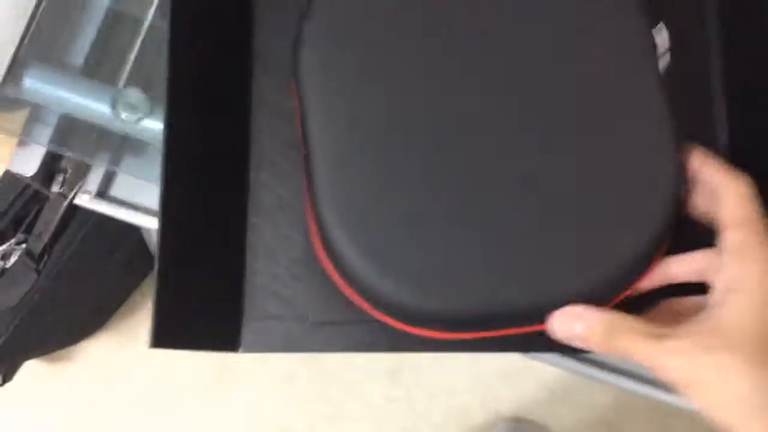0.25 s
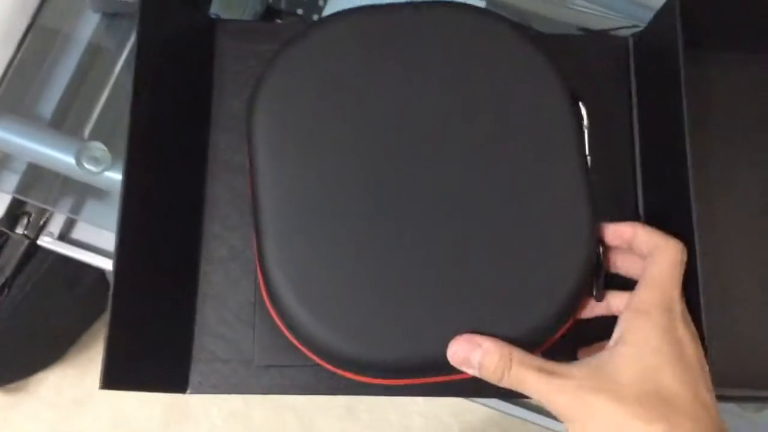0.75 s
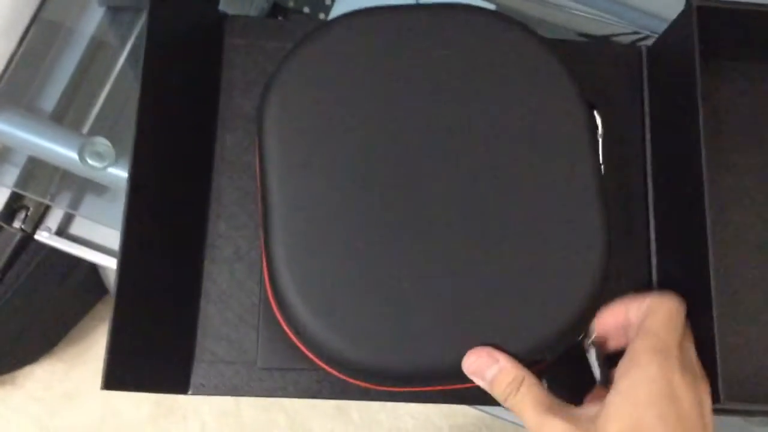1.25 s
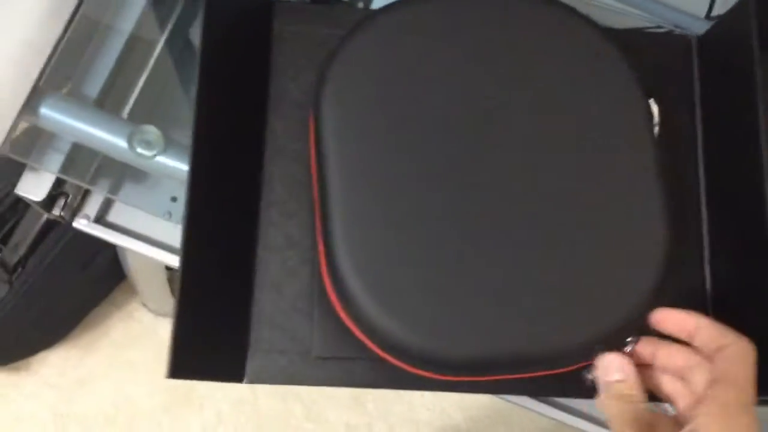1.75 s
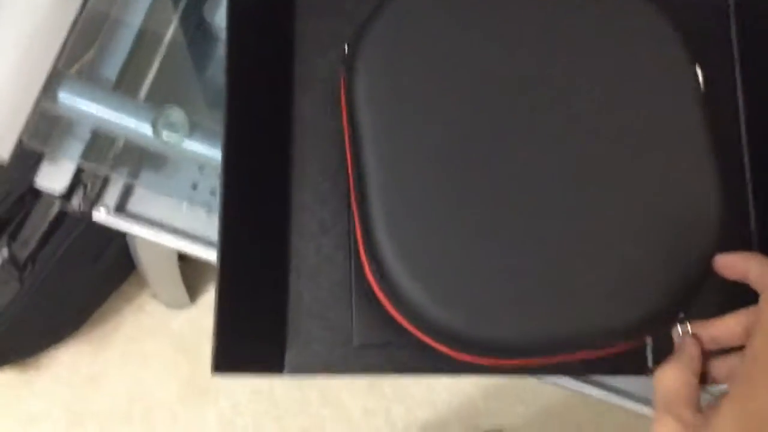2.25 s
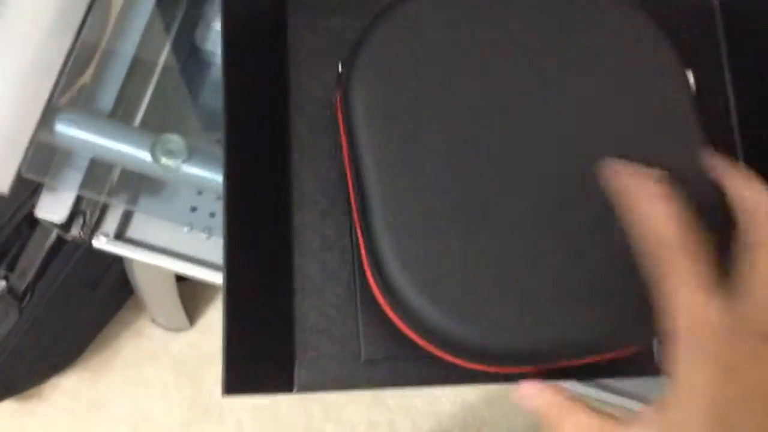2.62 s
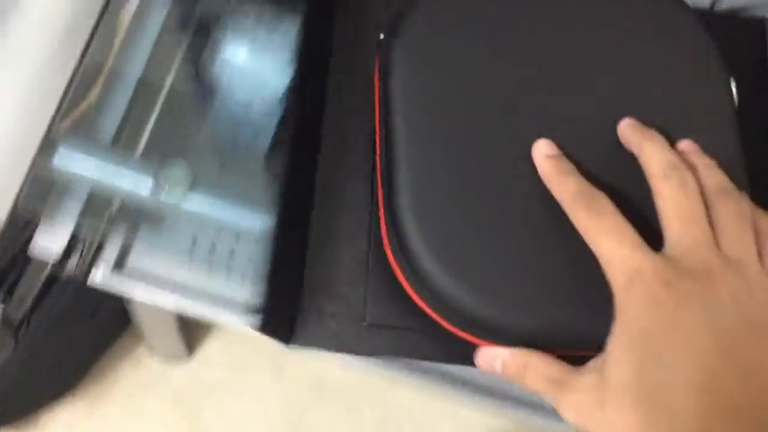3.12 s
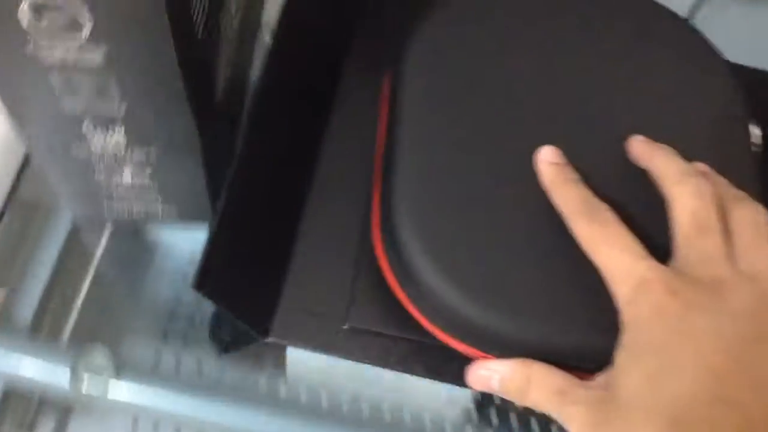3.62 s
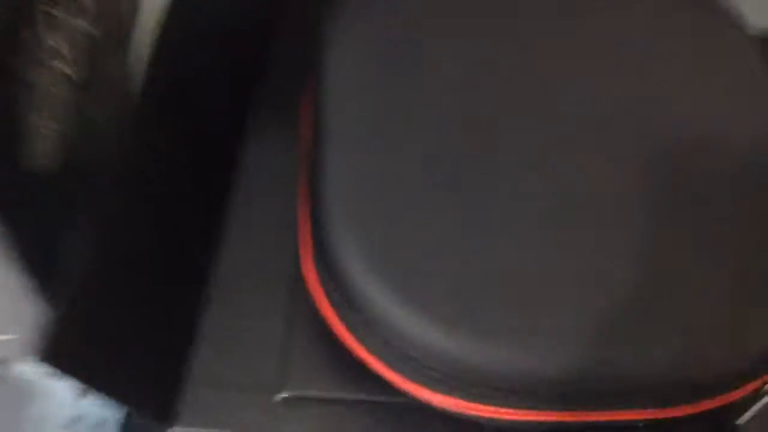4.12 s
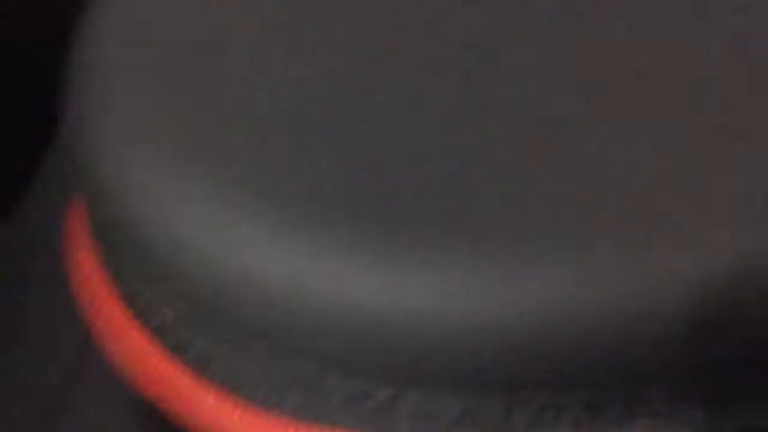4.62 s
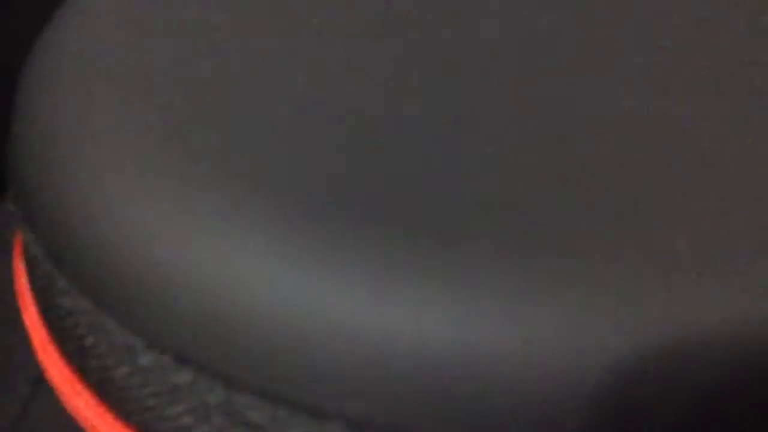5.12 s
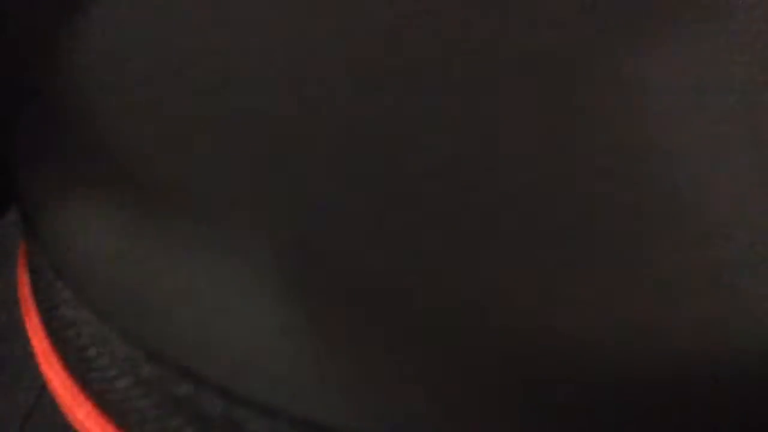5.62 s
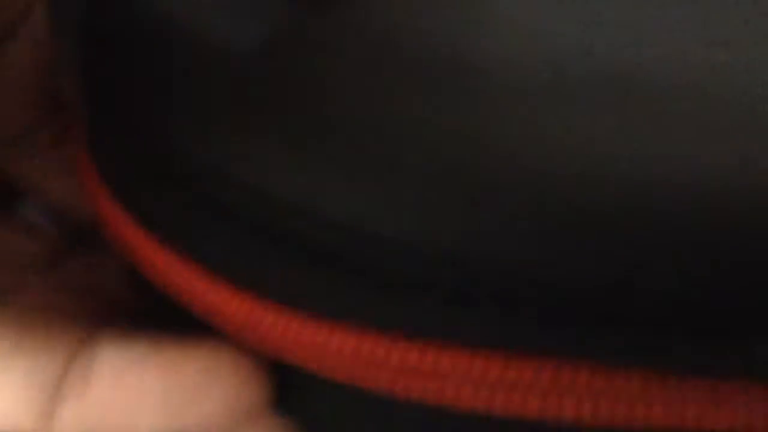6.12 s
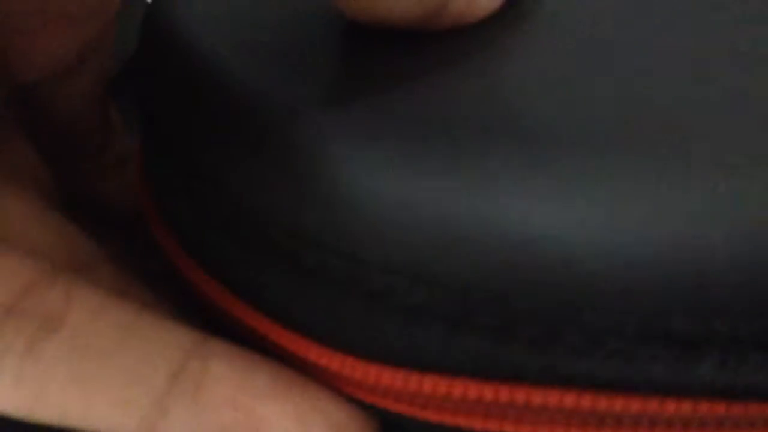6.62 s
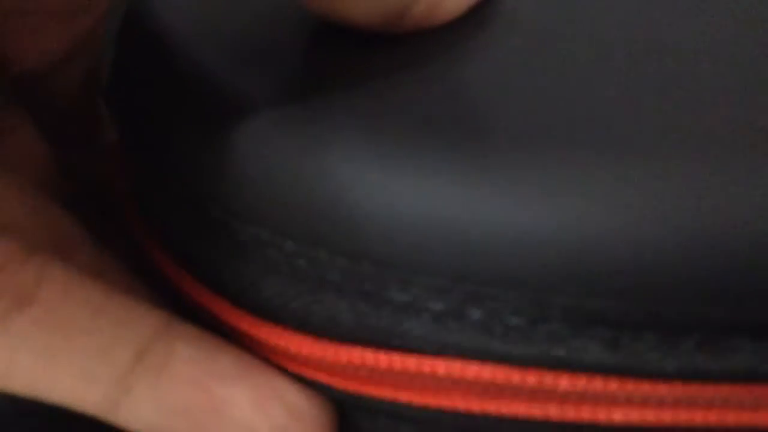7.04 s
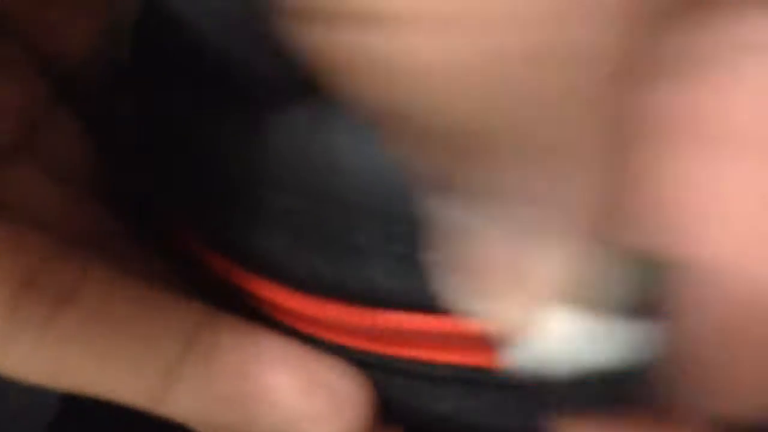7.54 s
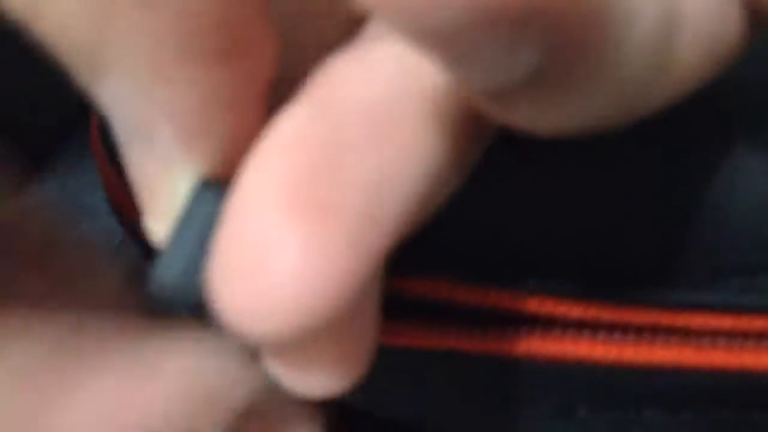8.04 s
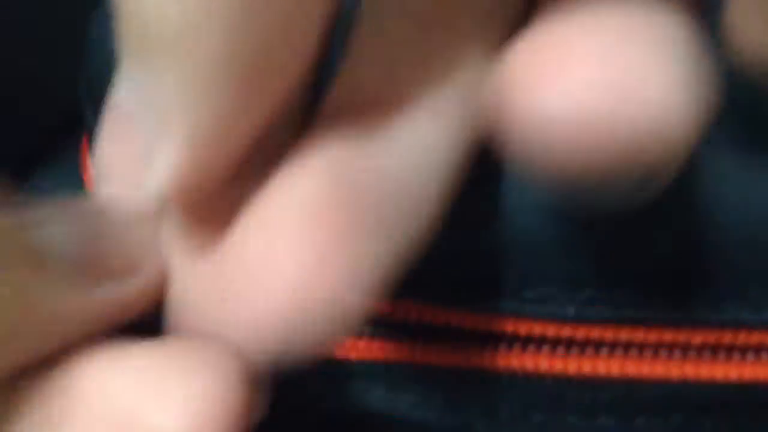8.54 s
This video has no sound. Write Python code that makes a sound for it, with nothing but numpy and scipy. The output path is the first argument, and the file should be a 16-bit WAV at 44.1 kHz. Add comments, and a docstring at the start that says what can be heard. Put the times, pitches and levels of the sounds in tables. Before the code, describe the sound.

Quiet strokes and nail ticks on a padded case, one hard box knock, loud handling thumps, then close, halting zipper rasps and clicks.

```python
"""First a hand strokes and taps a hard-shell case at arm's length in a small room; a box knocks sharply. Then
fingers bump and drag on the camera, and close by a zipper runs in short rasping tugs. Rubs are grainy filtered
noise, blows are short bursts through filters, and the box is a sum of decaying sines. The zipper is one impulse
per tooth, drumming on the resonant shell while its tape hisses. A noise tail makes the room; the microphone
trims the bass, the peaks and the top treble."""
import sys
import numpy as np
from scipy import signal
from scipy.fft import rfft, irfft, next_fast_len
from scipy.io import wavfile
from scipy.ndimage import uniform_filter1d

SR = 44100
rng = np.random.default_rng(int(sys.argv[2]) if len(sys.argv) > 2 else 0)


def to_wav(sig):
    """Store sig (one row per channel, or 1-D mono) as 16-bit WAV at the path in sys.argv[1].

    Samples outside -1..1 are clipped; the rate is SR.
    """
    pcm = np.clip(np.atleast_2d(sig), -1, 1) * 32767
    pcm = np.round(pcm).astype(np.int16)
    wavfile.write(sys.argv[1], SR, pcm.T)  # frames by channels


N = 387198  # samples


def amp(db):
    """Decibels to gain."""
    return 10 ** (np.asarray(db) / 20)


def unit(x):
    """Scale to rms 1."""
    return x / np.sqrt(np.mean(x ** 2) + 1e-20)


def along(points, hz):
    """Interpolate (Hz, value) points on a log frequency axis."""
    f, v = np.transpose(points)
    return np.interp(np.log(hz + 1), np.log(f), v)


def filtered(x, response):
    """Pass x through a complex response of frequency."""
    m = next_fast_len(N + SR // 2)
    spectrum = rfft(x, m) * response(np.fft.rfftfreq(m, 1 / SR))
    return irfft(spectrum, m)[:N]


def coloured(x, spectrum, size=4096):
    """Minimum-phase filter of unit energy with the given spectrum, so that no blow sounds early."""
    hz = np.fft.rfftfreq(size, 1 / SR)
    cepstrum = irfft(np.log(amp(along(spectrum, hz))))
    # fold the cepstrum forward in time
    cepstrum[1:size // 2] *= 2
    cepstrum[size // 2:] = 0
    kernel = irfft(np.exp(rfft(cepstrum)))
    return signal.oaconvolve(x, kernel / np.linalg.norm(kernel))[:N]


def resonance(f, centre, width):
    """Response of one damped mode."""
    return 1j * f * width / (centre ** 2 - f ** 2 + 1j * f * width)


def fibres(grain_hz, grain_db):
    """White noise whose strength wavers as fibres catch and slip."""
    grip_strength = np.interp(np.arange(N) * grain_hz / SR, np.arange(N), rng.standard_normal(N))
    return rng.standard_normal(N) * amp(grain_db * grip_strength)


def friction(spectrum, grain_hz, grain_db):
    """Grainy rubbing noise of rms 1 with the given spectrum."""
    return unit(coloured(fibres(grain_hz, grain_db), spectrum))


def patchy(x, depth_db):
    """The colour of a rub shifts from moment to moment as the point of contact moves."""
    z = signal.stft(x)[2]
    across_hz = uniform_filter1d(rng.standard_normal(z.shape), size=7, axis=0)
    field = uniform_filter1d(across_hz, size=11, axis=1)
    return unit(signal.istft(z * amp(depth_db * unit(field)))[1][:N])


def crackle(rate):
    """Sparse snaps of single fibres, on average rate a second: mostly tiny, a few large."""
    return (rng.random(N) < rate / SR) * rng.exponential(size=N).clip(0, 3)


def contacts(times, levels_db, t60, scuff):
    """Force of brief contacts: a sharp push, then a scuff that dies by 60 dB in t60 seconds."""
    force, t = np.zeros(N + SR), np.arange(SR // 4) / SR
    for s, db in zip(times, levels_db):
        burst = rng.standard_normal(len(t)) * amp(-60 * t / t60)
        burst *= scuff / np.linalg.norm(burst)
        burst[0] += 1
        force[round(s * SR):][:len(t)] += amp(db) * burst / np.linalg.norm(burst)
    return force[:N]


def gestures(rows, attack_s, release_s):
    """Attack, hold and release for each (start, length, dB, dB) row; one gain per dB column, adding in power."""
    t, power = np.arange(N) / SR, np.zeros((2, N))
    for start, length, *levels_db in rows:
        rise = np.sin(np.pi / 2 * np.clip((t - start) / attack_s, 0, 1)) ** 2
        fall = np.exp(-np.clip((t - start - length) / release_s, 0, 20))
        power += np.outer(amp(levels_db), rise * fall) ** 2
    return np.sqrt(power)


# Quiet room around the microphone. Each row: frequency in Hz, relative level in dB per Hz.
AIR_SPECTRUM = [(40, -16), (100, -3.5), (230, 7.5), (800, -1), (2500, -7), (15000, -11.5)]


def air():
    """The quiet room: steady noise with the given spectrum."""
    return amp(-64.5) * unit(coloured(rng.standard_normal(N), AIR_SPECTRUM))


# Decay of the small room. Each row: frequency in Hz, time to fall by 60 dB in seconds.
ROOM_DECAY = [(1000, 0.48), (3000, 0.41), (7000, 0.44), (15000, 0.12)]


def room(x):
    """The small room's tail, decaying noise of unit energy; the highest treble dies first."""
    hz, t, z = signal.stft(rng.standard_normal(SR * 2 // 3), SR, nperseg=256)
    decay = amp(-60 * t / along(ROOM_DECAY, hz)[:, None])
    tail = signal.istft(z * decay, SR, nperseg=256)[1]
    tail *= 1 - np.exp(-np.arange(len(tail)) / SR / 0.0018)  # the tail builds up over about 2 ms
    wet = signal.oaconvolve(x, tail / np.linalg.norm(tail))[:N]
    return filtered(wet, lambda f: f ** 2 / (f ** 2 + 120 ** 2))


# Skin on the shell. Each row: frequency in Hz, relative level in dB per Hz.
RUB_SPECTRUM = [(45, -37.5), (150, -6), (300, 1.5), (700, -6), (1100, -6.5), (1600, -10.5), (2200, -8.5),
                (3200, -20), (7000, -29.5)]
# Cloth swish. Each row: frequency in Hz, relative level in dB per Hz.
SWISH_SPECTRUM = [(1800, -22.5), (4400, 1), (6400, 1), (11000, -7), (15000, -15.5)]
# Small bright ticks, shared by fibres, nails and skin. Each row: frequency in Hz, relative level in dB per Hz.
TICK_SPECTRUM = [(700, -32.5), (2300, 0), (3200, -1.5), (5500, 2.5), (8000, -4), (15000, -13.5)]
# Strokes over the case. Each row: start in seconds, length in seconds, shell rub in dB, fabric swish in dB.
HAND_STROKES = [(0.02, 0.1, -59, -56), (0.175, 0.1, -62, -57), (0.32, 0.18, -60, -56),
                (0.52, 0.18, -64, -61), (0.94, 0.34, -56.5, -57), (1.29, 0.14, -48.5, -52.5),
                (1.48, 0.025, -69, -52.5), (1.67, 0.076, -63.5, -53.5), (1.80, 0.089, -63.5, -56.5),
                (2.04, 0.14, -60.5, -62), (2.545, 0.15, -58, -55.5), (2.81, 0.096, -52.5, -54),
                (3.04, 0.14, -56.5, -55), (3.12, 0.15, -52.5, -58), (3.45, 0.79, -69, -62),
                (3.74, 0.14, -59, -53), (4.22, 0.11, -51, -58.5), (4.32, 0.098, -53, -50),
                (4.43, 0.1, -45.5, -44), (4.80, 0.1, -51.5, -51), (5.215, 0.0354, -58.5, -61.5)]
# Light contact between strokes: start in seconds, length in seconds, shell rub in dB, fabric swish in dB.
RESTING_CONTACT = (-1.5, 5.5, -79, -70)


def sliding():
    """Skin and cloth slide on the fabric-covered shell; now and then a fibre snaps."""
    # the hand gathers speed, then coasts to rest
    rub_gain, swish_gain = gestures(HAND_STROKES + [RESTING_CONTACT], attack_s=0.051, release_s=0.049)
    stutter = amp(13.0) * coloured(crackle(rate=58), RUB_SPECTRUM)
    rub = stutter + patchy(friction(RUB_SPECTRUM, grain_hz=198.3, grain_db=3.0), depth_db=2.5)
    snaps = amp(19) * coloured(crackle(rate=35), TICK_SPECTRUM)
    swish = snaps + friction(SWISH_SPECTRUM, grain_hz=259, grain_db=1.5)
    return rub_gain * rub + swish_gain * swish


# Fingertips on the taut cover. Each row: middle in seconds, half length in seconds, pitch in Hz, level in dB.
FINGER_SQUEAKS = [(1.398, 0.11, 1050, -55), (5.936, 0.036, 1160, -56), (6.392, 0.039, 2000, -49),
                  (6.515, 0.029, 3730, -53.5), (6.694, 0.028, 426, -47), (6.78, 0.059, 786, -51.5),
                  (8.503, 0.022, 2240, -57)]


def squeaks():
    """Each slip of a fingertip is a brief swell of narrow, rough noise."""
    t, out = np.arange(N) / SR, np.zeros(N)
    for s, half, hz, db in FINGER_SQUEAKS:
        band = filtered(fibres(grain_hz=251, grain_db=3.5), lambda f: resonance(f, hz, 0.37 * hz) ** 2)
        out += amp(db) * np.exp(-((t - s) / half) ** 2) * unit(band)
    return out


# A fingertip on the cover: start in seconds, length in seconds, slips per second, resonance in Hz,
# force of a slip in dB before the resonance.
FINGER_JUDDER = (0.215, 0.095, 105, 556, -11)


def judder():
    """A fingertip sticks and slips: a run of soft, uneven pulses."""
    start, length, rate, hz, db = FINGER_JUDDER
    times = np.arange(start, start + length, 1 / rate)
    late, size = rng.standard_normal((len(times), 2)).T
    slips = contacts(times + 0.213 * late / rate, db + 2 * size, t60=0.041, scuff=0.88)
    return filtered(slips, lambda f: resonance(f, hz, 2 * hz) ** 4)


# Knock of a hard blow. Each row: frequency in Hz, relative level in dB per Hz.
KNOCK_SPECTRUM = [(200, -30), (550, 9), (1100, 5.5), (1700, -0.5), (3000, -15.5), (8000, -58)]
# Thud of a soft blow. Each row: frequency in Hz, relative level in dB per Hz.
THUD_SPECTRUM = [(30, -29.5), (90, -13.5), (185, 5), (350, 0), (700, -23), (3000, -58.5)]
# Nails and pull tab at arm's length. Each row: time in seconds, tick in dB, knock in dB relative to the tick,
# both before the gains added below.
NAIL_TAPS = [(0.0487,-29.5,-20.5), (0.3377,-37.5,-13.5), (0.534,-36.5,-30), (0.569,-40.5,-18),
             (1.016,-34,-16), (1.486,-37.5,-12.5), (1.4963,-28,-16.5), (1.6854,-39,-18),
             (1.735,-42.5,-12.5), (1.8776,-38.5,-22), (2.0141,-40,-15), (2.072,-44,-11), (2.5804,-30.5,-24),
             (2.6348,-27,-14), (2.8535,-31.5,-18), (3.1918,-26.5,-14.5)]
# The flat of the hand lands softly. Each row: time in seconds, thud in dB before the gain added below.
HAND_PATS = [(0.9756,-44), (2.8264,-38), (3.8326,-36.5)]


def taps():
    """Nails tick on the pull tab and knock the shell; the flat of the hand mostly thuds."""
    s, db, knock_db = np.transpose(NAIL_TAPS)
    pat_s, pat_db = np.transpose(HAND_PATS)
    tick = coloured(contacts(s, db + 13.0, t60=0.074, scuff=6.4), TICK_SPECTRUM)
    hard = contacts(s, db + knock_db + 26.0, t60=0.066, scuff=0.92)
    soft = contacts(pat_s, pat_db + 22.0, t60=0.045, scuff=0.59)
    knock = coloured(hard + amp(-12.5) * soft, KNOCK_SPECTRUM)
    thud = coloured(soft + amp(-9.5) * hard, THUD_SPECTRUM)  # a hard tap thuds less than it knocks
    return tick + knock + thud


# Crack of the box. Each row: frequency in Hz, relative level in dB per Hz.
CRACK_SPECTRUM = [(60, -38.5), (170, -3), (480, -2.5), (750, -9), (1100, -2.5), (2600, -14), (5500, -11),
                  (15000, -37)]
# Ringing of the box. Each row: frequency in Hz, level in dB, time to fall by 60 dB in seconds.
BOX_MODES = [(214, -25, 0.27), (372, -13.5, 0.054), (432, -21, 0.13), (552, -15, 0.056), (873, -6, 0.022),
             (1000, -13.5, 0.06), (1055, -37.5, 0.54), (1097, -37.5, 0.56), (1375, -18, 0.054)]


def box():
    """The box knocks: a crack, a dense shudder and ringing; two close modes sing on and beat."""
    hit_s = 3.2606
    t = np.maximum(np.arange(N) / SR - hit_s, 0)
    ring = np.zeros(N)
    for k, (hz, db, t60) in enumerate(BOX_MODES):
        ring += (-1) ** k * amp(db - 60 * t / t60) * np.sin(2 * np.pi * hz * t)
    crack = contacts([hit_s + 0.0006], [11], t60=0.019, scuff=5.2)
    shudder = contacts([hit_s + 0.004], [8], t60=0.28, scuff=10.0)
    return ring + coloured(crack + shudder, CRACK_SPECTRUM)


# Low shudder of skin on the camera. Each row: frequency in Hz, relative level in dB per Hz.
RUMBLE_SPECTRUM = [(50, -18), (180, -2.5), (420, -3.5), (700, -10.5), (3000, -17), (8000, -29)]
# A finger on the camera body. Each row: slip in seconds, swell in seconds, fade in seconds,
# rumble in dB, scratch in dB.
FINGER_DRAGS = [(4.607, 0.061, 0.015, -32.5, -42.5), (4.714, 0.045, 0.015, -35, -33),
                (4.757, 0.0061, 0.0082, -29, -37), (4.78, 0.013, 0.0085, -16, -20),
                (4.826, 0.0065, 0.03, -46.5, -33.5)]


def drags():
    """Each drag of a finger over the camera swells until it slips: first a rumble, then a scratch."""
    scratch_lag_s = 0.014
    t, rumble, scratch = np.arange(N) / SR, np.zeros(N), np.zeros(N)
    for s, swell_s, fade_s, rumble_db, scratch_db in FINGER_DRAGS:
        pressure = lambda u: np.exp(-np.minimum(np.maximum(-u / swell_s, u / fade_s), 20))
        rumble += amp(rumble_db) * pressure(t - s)
        scratch += amp(scratch_db) * pressure(t - s - scratch_lag_s)
    rumble *= friction(RUMBLE_SPECTRUM, grain_hz=300, grain_db=3)
    scratch *= friction(TICK_SPECTRUM, grain_hz=450, grain_db=4)
    return rumble + scratch


# Fingers on the camera body. Each row: time in seconds, click in dB, then knock and thud in dB relative to
# the click, all before the gains added below.
CAMERA_BUMPS = [(4.1397,-45.5,1,0.5), (4.3225,-34.5,-4.5,2), (4.4242,-28.5,-26,-28.5),
                (4.43,-28,-27.5,-26.5), (4.4607,-27,-24,-5.5), (4.5313,-21.5,-23.5,-18), (4.6077,-19.5,7,5),
                (4.7148,-4,-5.5,-9.5), (4.721,-20,0.5,-1.5), (4.7569,-21,0.5,0.5), (4.775,-19,-7.5,-2.5),
                (4.788,-11,-12,-17), (4.825,-4.5,-23,-25), (4.954,-19.5,-16,-9), (5.2494,-42.5,-5.5,7)]


def grip():
    """Fingers shift on the camera, heard straight through its body as click, knock and thud."""
    s, db, knock_db, thud_db = np.transpose(CAMERA_BUMPS)
    click = coloured(contacts(s, db + 11.0, t60=0.032, scuff=0.99), TICK_SPECTRUM)
    knock = coloured(contacts(s, db + knock_db + 22.5, t60=0.027, scuff=0.57), KNOCK_SPECTRUM)
    thud = coloured(contacts(s, db + thud_db + 18.0, t60=0.025, scuff=0.22), THUD_SPECTRUM)
    return click + knock + thud


# Zipper tape hiss: moment it stops in seconds, swell in seconds, level at its peak in dB.
TAPE_SLIP = (8.216, 0.075, -41.5)


def tape_slip():
    """The zipper tape gives a bright hiss that swells and stops dead."""
    stop_s, swell_s, db = TAPE_SLIP
    left_s = stop_s - np.arange(N) / SR
    hiss = unit(filtered(rng.standard_normal(N), lambda f: 1j * f / (1j * f + 2000)))
    return amp(db) * np.exp(-np.abs(left_s) / swell_s) * (left_s > 0) * hiss


# The case under the zipper. Each row: resonance in Hz, width in Hz, level in dB.
SHELL_MODES = [(194.5, 46, -7), (463, 555, -1), (667, 240, 2.5), (1022, 170, -4.5), (1370, 210, -4),
               (1750, 530, -12.5)]


def shell(force):
    """The hollow case answers with a few broad resonances; bending waves spread each blow over a few ms."""
    def response(f):
        modes = sum((-1) ** k * amp(db) * resonance(f, hz, width)
                    for k, (hz, width, db) in enumerate(SHELL_MODES))
        spread = (1 - 2 * resonance(f, 900, 700)) ** 2  # delays without changing the level
        low_cut = (1j * f / (1j * f + 100)) ** 3
        return modes * spread * low_cut / (1 + 1j * f / 3500)
    return filtered(force, response)


def teeth(speed, jitter, scatter_db):
    """One impulse for each tooth that parts, mean power 1; the slower the pull, the more uneven."""
    travel = np.cumsum(speed) / SR
    at = np.searchsorted(travel, np.arange(int(travel[-1])))
    late, size = rng.standard_normal((len(at), 2)).T * speed.max() / speed[at]
    period = SR / speed[at]
    sizes = unit(amp(scatter_db * size.clip(-4, 4))) * np.sqrt(period)
    samples = (at + jitter * period * late).astype(int).clip(0, N - 1)
    return np.bincount(samples, sizes, N)


# Bright rasp of a tooth. Each row: frequency in Hz, relative level in dB per Hz.
TOOTH_SPECTRUM = [(150, -30.5), (1000, 9), (2200, -4.5), (4000, 2), (5500, -7.5), (15000, -4)]
# Hiss of the zipper tape. Each row: frequency in Hz, relative level in dB per Hz.
TAPE_SPECTRUM = [(45, -31), (190, 6), (1200, 3.5), (4000, -1.5), (5500, -3.5), (12000, -2.5)]
# Speed of the slider. Each row: time in seconds, teeth per second.
SLIDER_SPEED = [(6.9, 95), (7.299, 165), (7.48, 150), (7.52, 280), (7.559, 430), (7.6, 300), (7.68, 190)]
# Tugs close to the microphone. Each row: start in seconds, length in seconds, teeth in dB, tape hiss in dB,
# both at creeping speed.
ZIPPER_TUGS = [(5.87, 0.0657, -77, -49.5), (5.9, 1.24, -63.5, -57.5), (5.93, 0.15, -56, -51),
               (6.085, .12, -53, -45), (6.26, 0.063, -60, -48.5), (6.35, .065, -48, -47),
               (6.49, 0.032, -49.5, -47), (6.645, 0.15, -58.5, -50), (6.812, 0.057, -39, -51),
               (6.95, 0.048, -50.5, -54.5), (7.13, 0.11, -56, -63), (7.23, 0.019, -46.5, -51),
               (7.26, 0.063, -37.5, -46), (7.472, 0.13, -32.5, -41), (7.745, 0.035, -51, -54),
               (7.826, 0.045, -44.5, -47.5), (7.92, 0.065, -55.5, -52), (8.465, 0.032, -51.5, -59),
               (8.63, 0.034, -59.5, -59)]
# The slider catches and snaps free. Each row: time in seconds, click in dB, knock in dB relative to the click,
# both before the gains added below.
SLIDER_CATCHES = [(6.1078,-33.5,-24), (6.135,-22,-4), (6.1402,-19.5,-4.5), (6.176,-23,-10), (6.189,-32,0),
                  (6.253,-38.5,5.5), (6.296,-35,-5.5), (6.3241,-40.5,2), (6.813,-47,10), (6.8301,-50,14.5),
                  (6.8581,-40,0), (6.923,-50,10.5), (7.1448,-43.5,0.5), (7.16,-49.5,14), (7.2194,-44.5,10),
                  (7.265,-41.5,5), (7.367,-42.5,4), (7.479,-38,6), (7.772,-31,-2.5), (7.832,-39,6.5),
                  (7.9094,-18,-12.5), (7.9189,-24,-14), (8.0935,-34.5,-27), (8.591,-45,4)]


def zipper():
    """Teeth click through the slider and drum on the shell while the tape hisses past."""
    speed = np.interp(np.arange(N) / SR, *np.transpose(SLIDER_SPEED))
    haste = speed / speed.max()
    # below the second row's speed the level grows no quieter
    creep = SLIDER_SPEED[1][1]
    effort = (np.maximum(speed, creep) / creep) ** 0.91
    # the slider breaks loose, then drags to a stop
    teeth_gain, tape_gain = effort * gestures(ZIPPER_TUGS, attack_s=0.0098, release_s=0.042)

    clicks = teeth(speed, jitter=0.05, scatter_db=1.6)
    # each tooth scrapes on through the slider for a moment after its click
    scrape_decay = np.exp(-1 / (0.0073 * SR))
    scrape = unit(signal.lfilter([1], [1, -scrape_decay], clicks) * rng.standard_normal(N))
    # a slow pull ratchets dully; a fast one buzzes and is brighter
    slow_push = np.sqrt(1.05 - haste) * (0.7 * clicks + 0.8 * scrape)
    soft = filtered(slow_push, lambda f: 1 / (1 + 1j * f / 820))
    body = unit(shell(haste * clicks + soft))
    rasp = unit(coloured(scrape, TOOTH_SPECTRUM)) * haste
    run = teeth_gain * (body + amp(-19) * rasp)

    s, db, knock_db = np.transpose(SLIDER_CATCHES)
    snaps = coloured(contacts(s, db + 15.5, t60=0.011, scuff=1.0), TOOTH_SPECTRUM)
    knocks = shell(contacts(s, db + knock_db + 37, t60=0.015, scuff=0.4))

    # the strained tape hisses and crackles
    creaks = amp(15) * coloured(crackle(rate=90), TOOTH_SPECTRUM)
    hiss = patchy(friction(TAPE_SPECTRUM, grain_hz=160, grain_db=2), depth_db=2.5)
    return run + snaps + knocks + tape_gain * (creaks + hiss)


def scene():
    """Taps at arm's length and the box fill the room; sounds near the camera stay almost dry, rubs fully dry."""
    far, knock = taps(), box()
    near = zipper() + tape_slip() + grip() + drags()
    rubs = sliding() + squeaks() + judder()
    wet = room(amp(-6.0) * far + amp(-13.5) * knock + amp(-20.0) * near)
    return (far + knock + near + rubs + wet + air())[None]


def record(dry):
    """The small microphone thins the bass, the loudest peaks are rounded, and nothing passes the band limit."""
    low_cut_hz, top_hz = 42, 15500
    thin = filtered(dry[0], lambda hz: hz ** 2 / (hz ** 2 + low_cut_hz ** 2))
    rounded = thin / (1 + (thin / 0.75) ** 4) ** (1 / 4)
    return filtered(rounded, lambda hz: hz < top_hz)[None]


dry = scene()
out = record(dry)
to_wav(out)
```